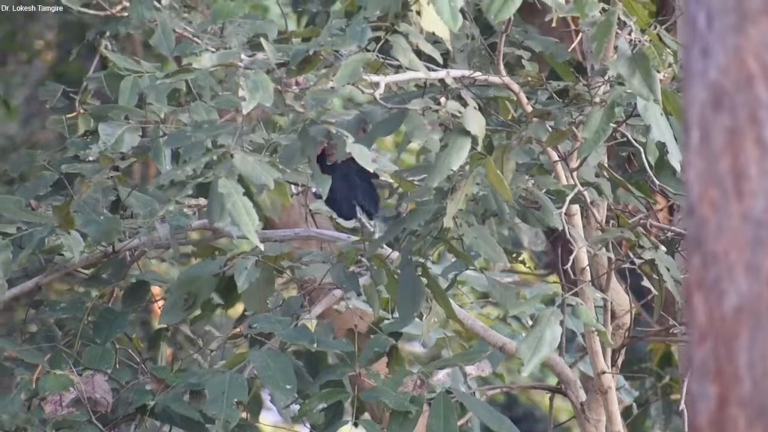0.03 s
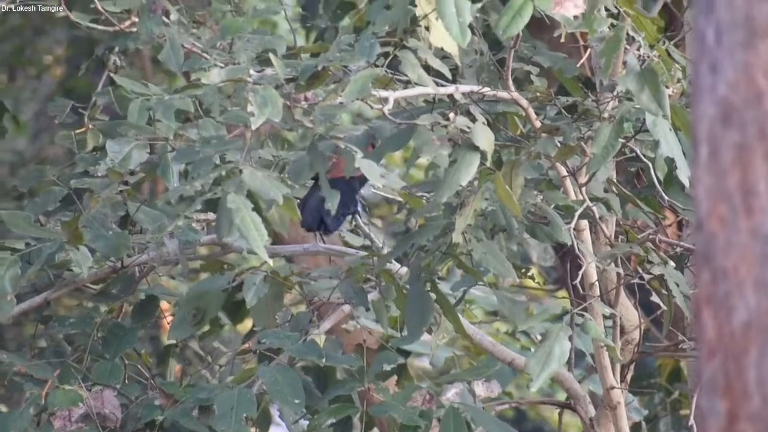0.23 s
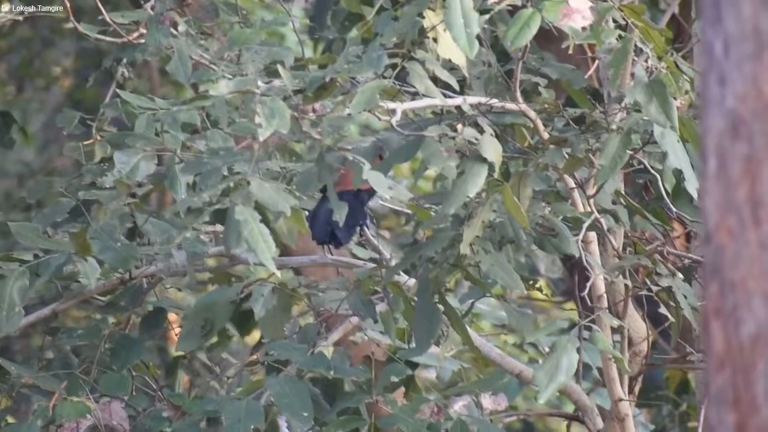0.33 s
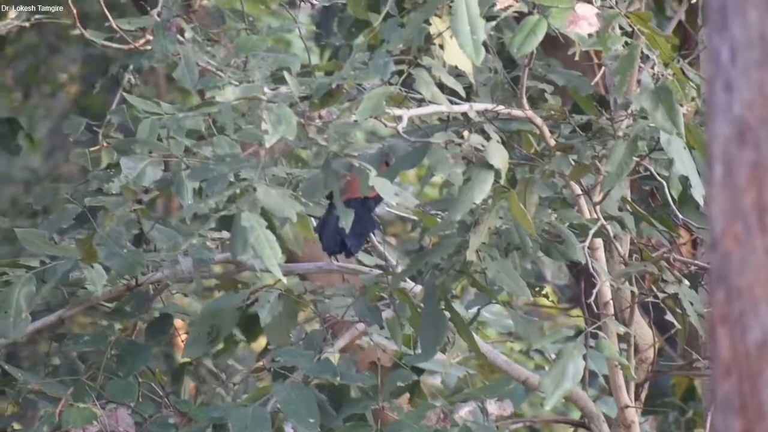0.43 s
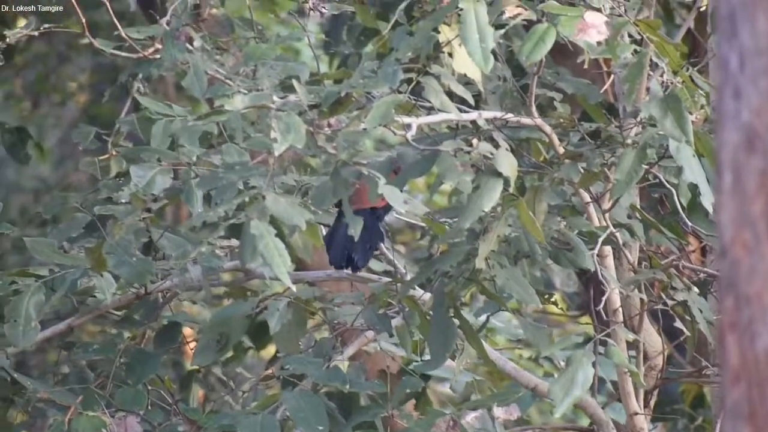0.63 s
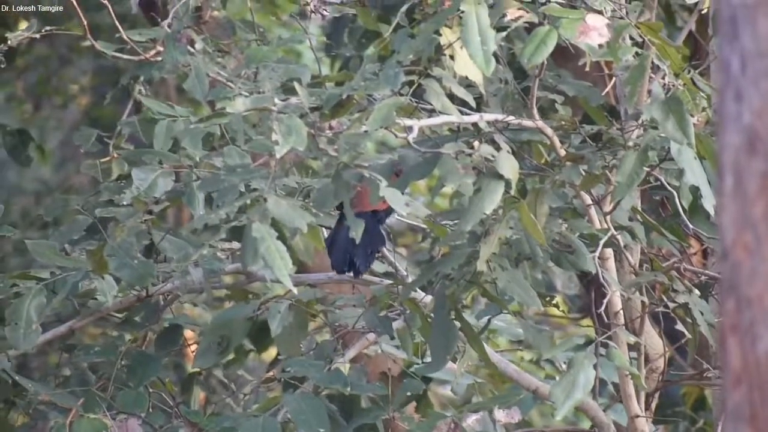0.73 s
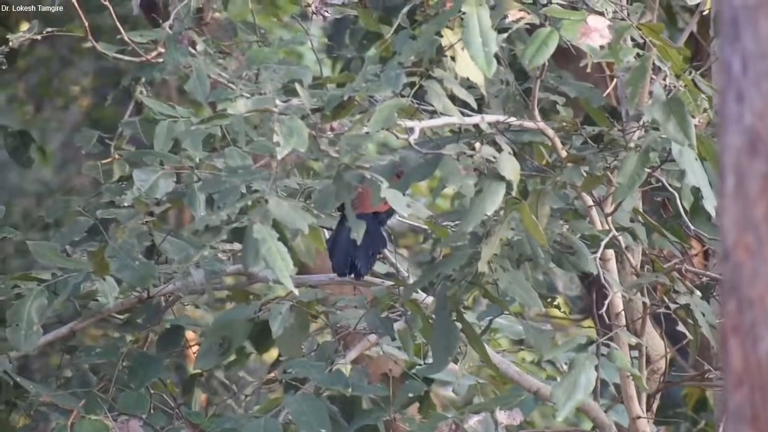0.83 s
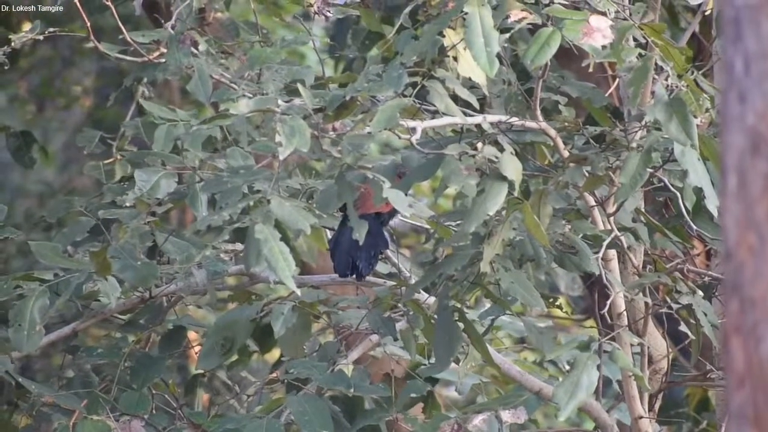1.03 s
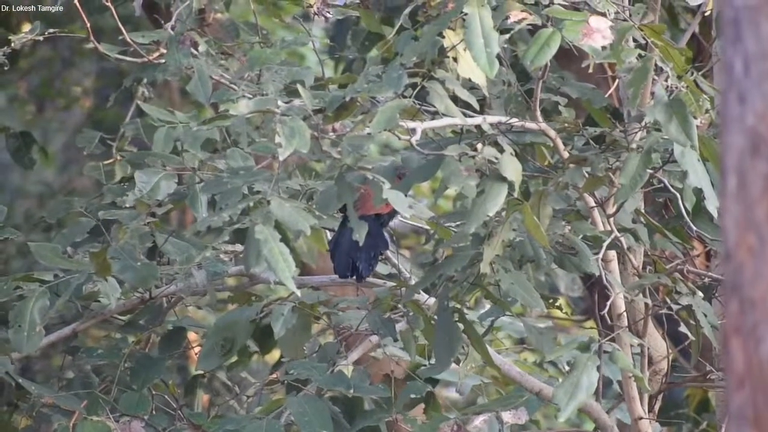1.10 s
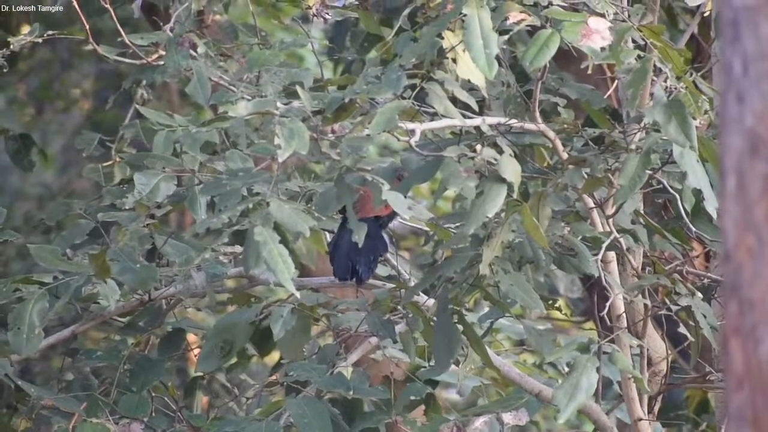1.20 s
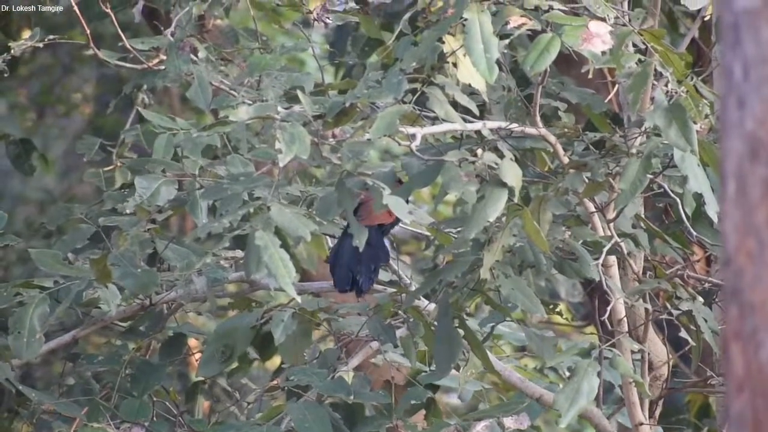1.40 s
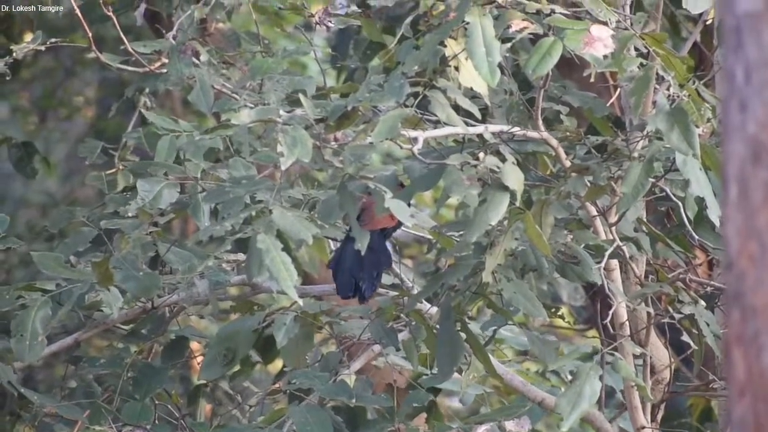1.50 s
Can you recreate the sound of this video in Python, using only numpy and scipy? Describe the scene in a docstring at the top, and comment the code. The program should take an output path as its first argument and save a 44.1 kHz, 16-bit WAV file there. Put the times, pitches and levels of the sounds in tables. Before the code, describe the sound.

A bird hoots three times, low and evenly spaced, each note echoing briefly among the trees. Farther off, small birds chirp and whistle faintly over steady outdoor hiss and a faint distant engine hum.

```python
"""Coucal in a leafy thicket

A coucal hoots three times as the echo of an earlier hoot dies away. Each hoot is an almost pure tone
that sags and lifts again; the trees reflect it and a low, wide rumble swells with it. Farther off,
small birds chirp and whistle, two twigs tick, and a distant engine hums under the outdoor hiss."""
import sys
import numpy as np
from scipy import signal
from scipy.fft import rfft, irfft
from scipy.io import wavfile
from scipy.ndimage import uniform_filter1d

SR = 44100
rng = np.random.default_rng(int(sys.argv[2]) if len(sys.argv) > 2 else 0)


def generate_wav(signal):
    """Clip the signal to [-1, 1] and save it as 16-bit WAV at the path in sys.argv[1]."""
    frames = np.transpose(np.atleast_2d(signal))
    scaled = np.clip(frames, -1, 1) * 32767
    pcm = np.round(scaled).astype(np.int16)
    wavfile.write(sys.argv[1], SR, pcm)


N = 68355
LEAD_S = 0.25  # tracks begin early, so an earlier sound can still reverberate
SONG_T60_S, SONG_PAN_DB = 0.68, 1


def amp(db):
    """Amplitude ratio of a level in decibels."""
    return 10 ** (np.asarray(db) / 20)


def unit(x):
    """Normalisation to rms 1."""
    return x / np.sqrt(np.mean(x ** 2) + 1e-20)


def curve(points, at):
    """Linear interpolation between points."""
    return np.interp(at, *np.transpose(points))


def by_hz(points, hz):
    """Interpolation on a log-frequency axis."""
    f, value = np.transpose(points)
    return np.interp(np.log(hz + 1), np.log(f + 1), value)


def pan(db):
    """Stereo gains for a level difference, left over right."""
    return amp([[db / 2], [-db / 2]])


def waver(size, hz):
    """Random modulation: low-pass noise of rms about 1."""
    f = np.fft.rfftfreq(2 * N, 1 / SR)
    return unit(irfft(rfft(rng.standard_normal(2 * N)) / (1 + (f / hz) ** 4)))[:size]


def flick(u):
    """A Gaussian's derivative: one swing up, then down, around u = 0."""
    return -u * np.exp(-u ** 2)


def add(track, start_s, sound):
    """Superposition of a sound on a track that begins LEAD_S early."""
    part = track[max(round((start_s + LEAD_S) * SR), 0):][:len(sound)]
    part += sound[:len(part)]


def arrival_gap(x, lag_s):
    """Path difference: the left microphone lags the right, or leads if lag_s is negative."""
    delay = np.exp(-2j * np.pi * np.fft.rfftfreq(2 * N, 1 / SR) * lag_s)
    return np.array([irfft(rfft(x[0], 2 * N) * delay)[:N], x[1]])


def thicket(track, wet_db, t60_s, echoes=()):
    """Reflection and scattering: direct sound, single echoes and an exponentially decaying tail."""
    t, build_s = np.arange(SR) / SR, 0.0096
    taps = rng.standard_normal((3, SR)) * (rng.random((3, SR)) < 3000 / SR)
    tail = taps[0] + 0.2 * taps[1:]  # mostly shared by both sides
    tail *= amp(-60 * t / t60_s) * (1 - np.exp(-(t / build_s) ** 2))
    response = amp(wet_db) * tail / np.linalg.norm(tail[0])
    response[:, 0] += 1
    for delay, db in echoes:
        response[:, round(delay * SR)] += amp(db)
    return signal.fftconvolve(track[None], response, axes=1)[:, round(LEAD_S * SR):][:, :N]


def air():
    """Partly coherent noise: outdoor hiss with drifting patches, and wind rumbling at the microphone."""
    # noise spectrum: frequency_hz, relative_density_db
    spectrum = [(20, -10.5), (70, -2), (135, -3), (190, 0), (265, -6), (400, -15), (620, -10), (900, -11.5),
                (1750, -12.5), (2500, -16.5), (4000, -18), (5000, -23), (6300, -26.5), (7300, -30.5),
                (10000, -31.5), (15800, -38)]
    # likeness of the two sides: frequency_hz, correlation
    coherence = [(30, 0.98), (100, 1), (250, 1), (600, 0.48), (1400, 0.73), (2500, 0.77), (5000, 0.8),
                 (8000, 0.48), (13000, 0.885)]
    # stereo balance: frequency_hz, left_over_right_db
    balance = [(60, -2.5), (400, -1.5), (1200, 1.8), (2500, 1), (5000, 1.5), (12000, 1)]
    # drift of the hiss at 0.9-6 kHz: time_s, gain_db
    treble = [(0, 1.5), (.3, 2.5), (.47, -1), (.7, 0.5), (.9, -0.5), (1.3, 0), (1.55, 3)]
    # drift of the hiss above 7 kHz: time_s, gain_db
    top_hiss = [(0, 2.5), (.35, 3), (.7, -0.5), (1.05, 4.5), (1.25, -1), (1.55, -2)]
    # puffs of wind: middle_s, half_length_s, gain_db
    puffs = [(0.37, 0.13, 16), (0.641, 0.067, 9.5), (0.747, 0.028, 25.5)]
    level_db, rumble_hz = -42, 76.5
    frames, hz = N // 512 + 5, np.fft.rfftfreq(2048, 1 / SR)
    t = np.arange(frames)[:, None] * 512 / SR
    a, b, c, d, patches = rng.standard_normal((frames, len(hz), 5)).transpose(2, 0, 1)
    patches_db = unit(uniform_filter1d(uniform_filter1d(patches, size=6, axis=0), size=20, axis=1))
    same, left = np.clip(by_hz(coherence, hz), -1, 1), a + 1j * b
    right = same * left + np.sqrt(1 - same ** 2) * (c + 1j * d)
    field_db = by_hz(spectrum, hz) + patches_db
    field_db += curve(treble, t) / (1 + (900 / (hz + 1)) ** 4) / (1 + (hz / 6000) ** 4)
    field_db += curve(top_hiss, t) / (1 + (7000 / (hz + 1)) ** 4)
    wind_db = sum(db * np.exp(-((t - middle) / half) ** 2) for middle, half, db in puffs)
    field_db += wind_db / (1 + (hz / rumble_hz) ** 4)
    side_db = by_hz(balance, hz) / 2
    spectra = np.array([left, right]) * amp([field_db + side_db, field_db - side_db])
    _, noise = signal.istft(spectra.transpose(0, 2, 1), nperseg=2048, noverlap=1536)
    return amp(level_db) * unit(noise[:, :N])


def engine():
    """Periodic vibration: a far engine's wavering hum swells and fades beside two faint drones."""
    # envelope of the hum: time_s, rms_level_db
    swell = [(0, -54), (.08, -41.5), (.27, -56.5), (.35, -41), (.49, -50), (.6, -39.5), (.72, -37.5),
             (.81, -50.5), (.93, -38), (1.2, -44.5), (1.32, -57), (1.4, -47), (1.55, -58)]
    # far machinery: pitch_hz, rms_level_db
    drones = [(200, -56.5), (302, -60.5)]
    pitch_hz = 105.8 * (1 + 0.029 * waver(N, 18))
    hum = amp(curve(swell, np.arange(N) / SR)) * np.sin(2 * np.pi * np.cumsum(pitch_hz) / SR)
    for hz, db in drones:
        level = amp(db) * (1 + 0.4 * waver(N, 3.7))
        pitch_hz = hz * (1 + 0.019 * waver(N, 16))
        hum += level * np.sin(2 * np.pi * np.cumsum(pitch_hz) / SR)
    return np.sqrt(2) * hum


def twitter():
    """Narrow-band noise stands for distant quick notes, smeared by scattering in the foliage."""
    # bands of song: middle_s, half_length_s, centre_hz, half_width_hz, level_db
    bands = [(0.293, 0.064, 3990, 558, -49), (0.439, 0.1, 4093, 547, -49.5),
             (0.608, 0.063, 3510, 400, -55.5)]
    t, out = np.arange(N) / SR, np.zeros((2, N))
    for middle, half, hz, width_hz, db in bands:
        shared, *sides = [waver(N, width_hz) * np.sin(2 * np.pi * (hz * t + rng.random()))
                          for _ in range(3)]
        out += amp(db) * np.exp(-((t - middle) / half) ** 2) * unit(shared + 0.41 * np.array(sides))
    return pan(SONG_PAN_DB) * out


def twigs():
    """Impulse excitation: each snap is a dry click and one heavily damped mode."""
    # snaps: start_s, ring_db, pitch_hz, ring_decay_s, click_db, left_over_right_db
    ticks = [(1.1624, -26.5, 7950, 0.00013, -39, -0.5), (1.4684, -25, 3260, 0.0012, -32, -1)]
    out, t, click_decay_s = np.zeros((2, N)), np.arange(1024) / SR, 0.00073
    for start, ring_db, hz, decay, click_db, side_db in ticks:
        burst = amp(click_db) * rng.standard_normal(len(t)) * np.exp(-t / click_decay_s)
        click = signal.lfilter(*signal.butter(2, min(hz, SR / 3), fs=SR), burst)
        ring = amp(ring_db) * np.sin(2 * np.pi * hz * t) * np.exp(-t / decay)
        track = np.zeros(2 * N)
        add(track, start, ring + click)
        out += pan(side_db) * thicket(track, wet_db=-27, t60_s=0.41)
    return out


def whistles():
    """Reverberation among the trees blurs the soft gliding tones of far birds."""
    # glides: start_s, length_s, first_hz, last_hz, level_db
    notes = [(.115, .15, 1750, 1834, -49.5), (0.117, 0.083, 3255, 3770, -49.5),
             (0.421, 0.14, 3040, 3005, -48.5), (0.488, 0.052, 2600, 2687, -50.5),
             (0.533, 0.074, 3200, 3670, -49), (1, 0.081, 3700, 3764, -56), (1.17, 0.051, 4456, 4150, -52),
             (1.261, 0.213, 3970, 4113, -53.5)]
    track = np.zeros(2 * N)
    for start, length, first_hz, last_hz, db in notes:
        u = np.arange(0, length, 1 / SR) / length
        pitch = (first_hz + (last_hz - first_hz) * u) * (1 + 0.013 * waver(len(u), 190))
        level = amp(db) * np.sqrt(abs(np.sin(np.pi * u)))
        add(track, start, level * np.sin(2 * np.pi * np.cumsum(pitch) / SR))
    return pan(SONG_PAN_DB) * thicket(track, wet_db=-2, t60_s=SONG_T60_S)


def chirps():
    """Frequency modulation: a small bird's notes arch up, thin at the top and swoop down."""
    # arched notes: top_s, rise_s, fall_s, top_hz, lowest_hz, level_db
    arches = [(0.015, 0.16, 0.046, 6520, 4866, -43.5), (.068, .015, .028, 6000, 4800, -54),
              (0.124, .015, 0.021, 6000, 5050, -49.5), (0.146, .05, .051, 6900, 4760, -47),
              (.202, .048, 0.046, 6950, 4800, -44.5), (0.395, 0.013, 0.029, 7150, 4680, -51.5),
              (.446, .006, 0.044, 7350, 4150, -49.5), (.785, .012, .032, 7500, 6750, -55)]
    top_db, rising_db, flicker_db, edge_s = -4.5, -3, 3, 0.004
    track = np.zeros(2 * N)
    for top, rise, fall, hz, low_hz, db in arches:
        t = np.arange(-rise, fall, 1 / SR)
        away = np.where(t < 0, -t / rise, t / fall)  # 0 at the top, 1 at either end
        pitch = (hz + (low_hz - hz) * away ** 1.3) * (1 + 0.01 * waver(len(t), 300))
        level = amp(db + top_db * (1 - away) + rising_db * (t < 0) + flicker_db * waver(len(t), 90))
        level *= np.clip(np.minimum(t + rise, fall - t) / edge_s, 0, 1)
        add(track, top - rise, level * np.sin(2 * np.pi * np.cumsum(pitch) / SR))
    return pan(5.5) * arrival_gap(thicket(track, wet_db=-9.5, t60_s=SONG_T60_S), lag_s=-0.00003)


def throb(hoots):
    """Amplitude modulation: a low rumble, in antiphase on the two sides, follows the hoots' power."""
    # rumble spectrum: frequency_hz, relative_density_db
    spectrum = [(20, -8), (65, 0), (110, -2), (180, -15.5), (300, -19), (1500, -61)]
    level_db, follow_exponent, lag_s = -26.5, 0.81, 0.016
    pole = np.exp(-1 / (lag_s * SR))
    power = signal.lfilter([1 - pole], [1, -pole], hoots.mean(0) ** 2)
    envelope = (power / power.max()) ** (follow_exponent / 2)
    colour = amp(by_hz(spectrum, np.fft.rfftfreq(2 * N, 1 / SR)))
    noise = irfft(rfft(rng.standard_normal(2 * N)) * colour)[:N]
    return np.array([[1], [-1]]) * amp(level_db) * unit(noise) * envelope


def coucal():
    """Nearly simple harmonic motion: a tone from a swollen throat sags in pitch and level mid-hoot."""
    # calls: start_s, length_s, level_db, pitch_hz, drift_share_of_pitch, sag_share_of_pitch,
    # dip_db, dip_at_share_of_length, release_s
    hoots = [(-.14, 0.099, -11, 490.9, 0.064, 0.081, 2.3, 0.56, 0.0099),
             (.216, 0.1174, -12.5, 485.3, 0.068, 0.073, 3.1, 0.501, 0.005),
             (.565, 0.12, -12.5, 475.2, -0.022, 0.055, 4.5, .475, 0.011),
             (.894, 0.12, -13, 464.1, -0.01, 0.049, 6.9, 0.46, .018)]
    # envelope of one hoot: share_of_length, gain_db
    swell = [(0, -17), (.09, -8.5), (.21, -2.5), (.45, 0.25), (.69, 0.5), (.82, -3.5), (.92, -8),
             (1, -19.5)]
    # cracks of the voice, flicking the pitch up and down: time_s, width_s, scale_share_of_pitch
    cracks = [(0.2964, 0.0022, 0.26), (0.94, 0.0019, 0.16)]
    # reflections from trunks, overlapping so that each hoot's tail flutters: delay_s, gain_db
    echoes = [(.0395, -20.3), (.0595, -24.5), (.0813, -30.5), (.1007, -25), (.1184, -28.5), (.1336, -25.5),
              (.1481, -26.5), (.2211, -31)]
    sag_period, dip_width = 0.722, 0.12  # shares of a hoot's length
    jitter, shimmer, waver_hz, attack_s = 0.0054, 0.046, 119, 0.012
    track = np.zeros(2 * N)
    for start, length, db, hz, drift, depth, dip_db, dip_at, release in hoots:
        t = np.arange(0, length, 1 / SR)
        u = t / length
        crack = sum(size * flick((start + t - s) / width) for s, width, size in cracks)
        sag = depth * np.cos(2 * np.pi * (u - dip_at) / sag_period)
        pitch = hz * (1 - sag + drift * (u - 0.5) + crack + jitter * waver(len(t), waver_hz))
        level = amp(db + curve(swell, u) - dip_db * np.exp(-((u - dip_at) / dip_width) ** 2))
        level *= np.clip(np.minimum(t / attack_s, (length - t) / release), 0, 1)
        level *= 1 + shimmer * waver(len(t), waver_hz)
        add(track, start, level * np.sin(2 * np.pi * np.cumsum(pitch) / SR))
    return pan(-0.5) * thicket(track, wet_db=-21, t60_s=1, echoes=echoes)


def scene():
    """Superposition of all the sources at two microphones."""
    hoots = arrival_gap(coucal(), lag_s=0.00007)
    return hoots + throb(hoots) + chirps() + whistles() + twitter() + twigs() + engine() + air()


def record(dry):
    """Band limiting by a linear-phase low-pass filter."""
    low_pass = signal.firwin(511, cutoff=15850, window=("kaiser", 9), fs=SR)
    return signal.oaconvolve(dry, low_pass[None], "same")


dry = scene()
out = record(dry)
generate_wav(out)
```